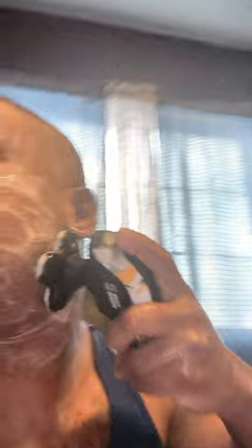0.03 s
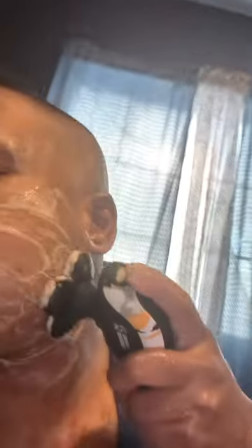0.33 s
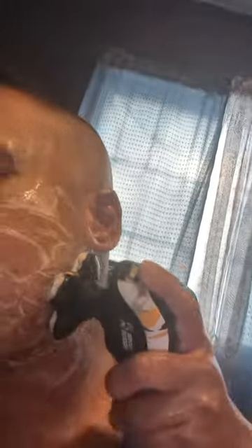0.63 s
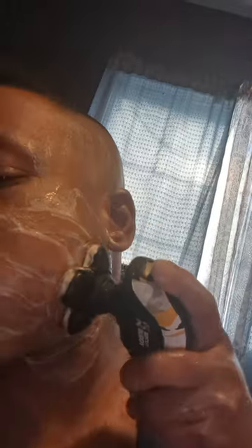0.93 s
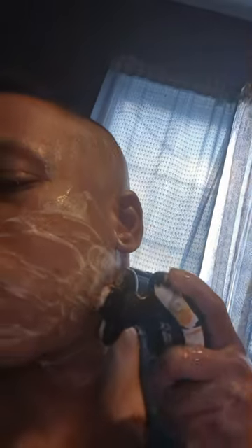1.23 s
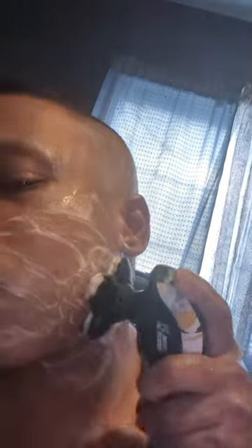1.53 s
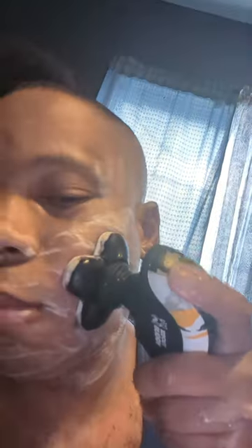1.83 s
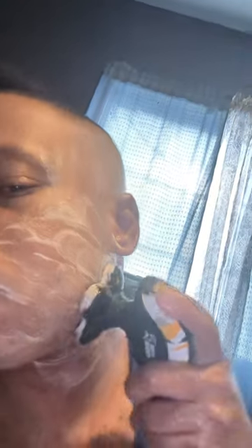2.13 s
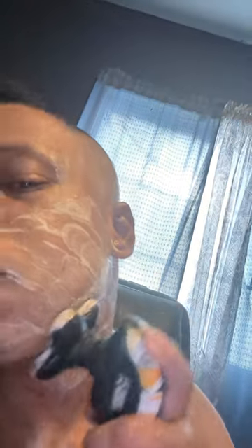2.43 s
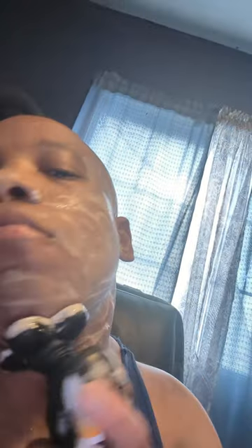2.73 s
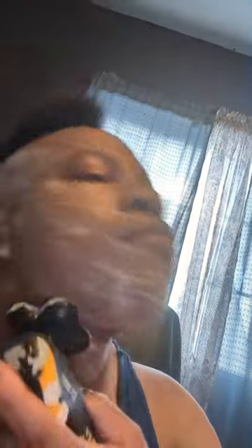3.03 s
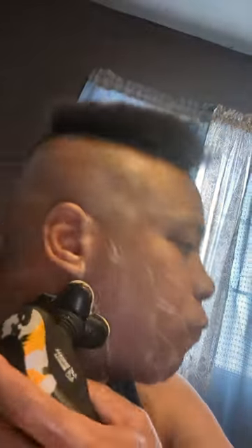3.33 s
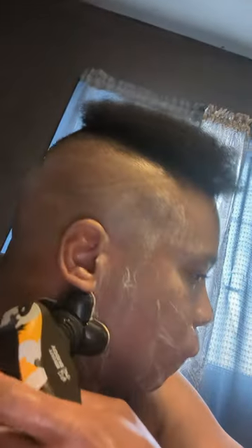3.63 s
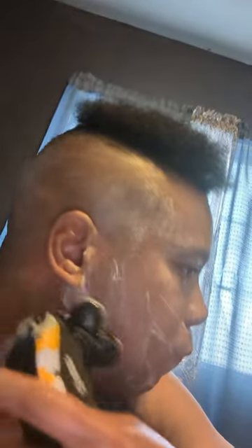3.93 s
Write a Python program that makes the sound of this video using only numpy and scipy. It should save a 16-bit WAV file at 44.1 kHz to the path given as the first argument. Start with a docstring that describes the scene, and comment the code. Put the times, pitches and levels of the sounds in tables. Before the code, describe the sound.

A rotary electric shaver runs close to the microphone in a small room, its high whine wavering as the blades rasp over stubble. A few soft handling bumps and a faint low rumble lie beneath.

```python
"""In a small room, a rotary electric shaver is worked over a cheek, close to a hand-held camera.
A small gear on the motor drives the cutters: the gear teeth whine, sag in pitch under pressure
and throb once per cutter turn. The blades rasp in their caps, which ring and scrape on the skin.
The hand bumps the camera softly over a low room rumble."""
import sys
import numpy as np
from scipy import signal
from scipy.fft import rfft, irfft, next_fast_len
from scipy.io import wavfile
from scipy.ndimage import uniform_filter1d, map_coordinates

SR = 44100
rng = np.random.default_rng(int(sys.argv[2]) if len(sys.argv) > 2 else 0)


def transcribe(u):
    """Save the signal u as a 16-bit wav file named by the first command-line argument.

    u: samples, shape (n,) or (channels, n), limited to [-1, 1]; the rate is SR.
    q: integer samples, one column per channel.
    """
    v = np.clip(np.atleast_2d(u).T, -1, 1)
    q = np.round(v * 32767).astype(np.int16)
    wavfile.write(sys.argv[1], SR, q)


N = 176400
MOTOR_TEETH, CUTTER_TEETH = 11, 30  # teeth on the motor's gear and on a cutter's gear


def cutter_turning():
    """The cutter's angle in radians; it turns more slowly when the shaver is pressed on."""
    # pitch of the main whine, twice the rate at which teeth meet (time [s], pitch [Hz])
    whine_hz = [(0, 2873), (.15, 2840), (.35, 2874), (.45, 2845), (.57, 2863), (.68, 2813), (.78, 2794),
                (.9, 2848), (1.0, 2804), (1.12, 2819), (1.2, 2791), (1.3, 2806), (1.42, 2757), (1.55, 2816),
                (1.7, 2788), (1.85, 2766), (1.97, 2827), (2.1, 2794), (2.27, 2840), (2.5, 2830),
                (2.75, 2818), (2.9, 2841), (3.03, 2875), (3.25, 2856), (3.42, 2833), (3.6, 2814),
                (3.8, 2790), (3.9, 2750), (4, 2664)]
    return 2 * np.pi * np.cumsum(curve(whine_hz) + 1.53 * wobble(18)) / (2 * CUTTER_TEETH * SR)


def gear_whine(cutter):
    """Meeting teeth whine; firm contact makes the whine loud and steadies its throb."""
    # the clear part of the whine (time [s], relative level [dB])
    whine_db = [(0, -44), (.08, -42), (.15, -51), (.398, -55.5), (.42, -38), (.52, -42.5), (.61, -38),
                (.645, -45), (.77, -44), (.91, -53), (.97, -47), (1.03, -50.5), (1.12, -41.5), (1.28, -53),
                (1.41, -44.5), (1.47, -48.5), (1.52, -39), (1.6, -56), (1.7, -42), (1.78, -46.5),
                (1.88, -60), (2.06, -50.5), (2.15, -55), (2.26, -43), (2.5, -54.5), (2.8, -45.5),
                (3.05, -51.5), (3.38, -56), (3.43, -40), (3.49, -36.5), (3.63, -50.5), (3.69, -40.5),
                (3.91, -49.5), (4, -40.5)]
    level = curve(whine_db)
    loose = np.interp(level, [-41.5, -37], [1, .45])
    clear = tone(cutter, 2 * CUTTER_TEETH, blur=.06, flutter_db=.7, drift=.1, pan_db=1.5, lead=-.7)
    blurred = tone(cutter, 2 * CUTTER_TEETH, blur=.25, flutter_db=3, drift=.17, pan_db=2.5, lead=1.87)
    whine = amp(level + 3.5) * clear + amp(-46) * blurred
    return whine * throb(cutter, depth_db=3.6 * loose, rough_db=2 * loose)


def cap_tone(cutter):
    """The caps over the blades sing their own note, 69 cycles per cutter turn."""
    # the note's strength (time [s], level [dB])
    note_db = [(.38, -55), (.43, -39), (.6, -41.5), (.7, -53), (1.2, -49), (1.5, -54), (2.4, -48.5),
               (2.8, -40.5), (3.1, -50), (3.3, -46), (4, -56)]
    note = tone(cutter, 69, blur=.08, flutter_db=1, drift=.2, lead=-.5)
    return amp(curve(note_db)) * throb(cutter, depth_db=1.5, rough_db=1.2) * note


def gear_tones(cutter):
    """Weaker gear tones, each locked to the turning of the cutter."""
    # low tones (cycles per turn), (level [dB]), and their shared swell (time [s], gain [dB])
    low_cycles = [30, 30.69, 31]
    low_db = [-60, -59.5, -64]
    swell_db = [(0, -1), (1.05, 0.5), (1.5, -3), (1.92, 2), (2.7, 0), (2.87, -13), (3.3, -4), (4, -1)]
    # steady tones (cycles per turn), (level [dB])
    steady_cycles = [35.45, 43.6, 120, 150]
    steady_db = [-62, -64, -63.5, -64]
    # two buzzes that trade places as the grip changes (cycles per turn), each (time [s], level [dB])
    buzz_cycles = [39, 46]
    buzz_db = [
        [(.7, -58), (1.4, -63), (2.5, -58), (3, -70), (3.3, -57), (4, -60)],
        [(0, -69), (.5, -59), (1.4, -67), (1.8, -61), (2.65, -53.5), (2.9, -62.5), (3.4, -55.5), (4, -60)],
    ]
    # two rougher, chattering tones (cycles per turn), both (time [s], level [dB])
    chatter_cycles = [90, 92]
    chatter_db = [(.25, -61), (.45, -52), (.85, -58), (1.2, -49.5), (1.7, -59), (2.4, -49), (2.85, -47.5),
                  (3.25, -58), (4, -55)]
    notes = [(cycles, db + curve(swell_db)) for cycles, db in zip(low_cycles, low_db)]
    notes += [*zip(steady_cycles, steady_db), *zip(buzz_cycles, map(curve, buzz_db))]
    out = np.zeros((2, N))
    for cycles, db in notes:
        note = tone(cutter, cycles, blur=.1, flutter_db=2, drift=.35, lead=-.4)
        out += amp(db) * throb(cutter, depth_db=.7, rough_db=2) * note
    for cycles in chatter_cycles:
        chatter = tone(cutter, cycles, blur=.22, flutter_db=2, drift=.4, lead=-.4)
        out += amp(curve(chatter_db)) * throb(cutter, depth_db=.7, rough_db=3) * chatter
    return out


def blade_rasp(cutter):
    """Rubbing blades and rattling gears make noise in a low, a middle and a high band."""
    # each band's strength (time [s], relative level [dB])
    low_db = [(0, -49.5), (.56, -46.5), (.7, -49), (1.41, -47), (2.57, -47.5), (3.01, -49.5), (3.3, -46.5),
              (4, -48)]
    mid_db = [(0, -44), (.45, -43), (.92, -45), (1.12, -40.5), (1.54, -43), (1.89, -46), (2.1, -42.5),
              (2.27, -41), (2.42, -41.5), (2.78, -40.5), (2.96, -43), (3.08, -39.5), (3.2, -44),
              (3.42, -41.5), (3.59, -42), (3.74, -40.5), (4, -41.5)]
    high_db = [(0, -45), (.65, -46.5), (.81, -44.5), (1.27, -45.5), (1.57, -47), (1.87, -43.5), (2.38, -48),
               (2.75, -43.5), (3.12, -46.5), (3.78, -42.5), (4, -45.5)]
    # each band's tone colour (frequency [Hz], relative level [dB])
    low_colour = [(400, -21), (900, -19), (1230, -12.5), (1420, -3.5), (1530, -5.5), (1650, 0), (1830, 2),
                  (2080, -2), (2500, 0.5), (2800, -7.5), (3500, -55)]
    mid_colour = [(1900, -39), (2450, -7), (2700, -1.5), (3480, -1.5), (3900, -4), (4270, -2), (4500, -3.5),
                  (4750, -9), (5200, -23), (6500, -67)]
    high_colour = [(3800, -17), (4900, 1), (5550, 3), (6800, -1.5), (7600, 1), (8100, -3), (8800, -0.5),
                   (9500, -7), (10000, -3.5), (10700, -8), (11600, -4.5), (12800, -3.5), (15700, -6)]
    low = rasp(cutter, low_db, low_colour, throb_db=1, beat_db=.93, repeats=(.43, .44))
    mid = rasp(cutter, mid_db, mid_colour, gain_db=2, throb_db=-.1, beat_db=.8, repeats=(.31, .44))
    high = rasp(cutter, high_db, high_colour, gain_db=2, throb_db=.7, beat_db=.72, repeats=(.31, .41))
    return low + mid + high


def cap_ringing(cutter):
    """The caps ring near 3 kHz as they bite stubble, zing between strokes, and have a thin top ring."""
    # strength of the bite, the zing and the top ring (time [s], level [dB])
    bite_db = [(0, -42), (.2, -48), (.39, -44), (.45, -45), (.6, -42), (.72, -44.5), (.9, -48), (1.15, -46),
               (1.55, -40), (1.88, -51), (2.12, -42.5), (2.27, -38), (2.45, -41.5), (2.82, -38),
               (2.97, -42), (3.06, -39.5), (3.14, -45), (3.22, -42), (3.42, -41.5), (3.62, -46), (4, -45)]
    zing_db = [(0, -59), (.16, -47), (.3, -48), (.42, -60), (.75, -59), (.83, -45.5), (.93, -48.5),
               (1.06, -60), (1.6, -57), (1.9, -49), (2.22, -55), (2.75, -47.5), (3.1, -50), (3.55, -57.5),
               (4, -53)]
    top_db = [(0, -67), (.15, -50.5), (.58, -52), (.8, -62), (1.05, -51.5), (1.4, -62), (1.8, -52),
              (2.35, -60), (2.6, -51), (2.82, -48), (3.0, -55), (4, -55)]
    # tone colour of the bite (frequency [Hz], relative level [dB])
    bite_colour = [(2600, -66), (2780, -10), (2930, -6), (3100, -1), (3260, -3.5), (3380, -8.5),
                   (3700, -25)]
    zing = rasp(cutter, zing_db, resonance(hz=8730, width_hz=860))
    top = rasp(cutter, top_db, resonance(hz=11750, width_hz=1060))
    return zing + top + rasp(cutter, bite_db, bite_colour)


def skin_scrape(cutter):
    """Pressing the shaver on the skin brings out a bright scrape, louder on the left."""
    # how hard it presses (time [s], relative level [dB])
    press_db = [(.25, -3.5), (.42, 5.5), (.65, 1), (.95, -2.5), (1.15, 5.5), (1.4, 4), (1.6, 1),
                (2.05, 0.5), (2.4, 2), (2.8, 8.5), (3.05, 3), (3.2, -2), (3.45, 3.5), (4, 1)]
    # tone colour of the scrape (frequency [Hz], relative level [dB])
    colour = [(3500, -53), (5050, -10), (5580, 6), (5950, 1), (6300, 3), (7400, -4), (10000, -31)]
    return rasp(cutter, press_db, colour, gain_db=-53) * amp([[3], [-5]])


def hand_bumps():
    """The hand bumps the camera: each dull thud sets the camera body humming."""
    # soft bumps (time [s], half length [s], relative level [dB])
    bumps = [(0.161, 0.0094, -50.5), (0.362, 0.03, -50.5), (.68, 0.01, -52.5), (0.753, 0.022, -49),
             (1.11, 0.05, -60.5), (1.283, 0.048, -57.5), (2.565, .02, -47.5), (3.747, 0.022, -43.5)]
    # tone colour of a thud (frequency [Hz], relative level [dB])
    colour = [(30, -48), (60, -18), (102, -6), (175, -18), (228, -10.5), (260, -2.5), (295, -13),
              (545, -23), (1200, -65)]
    body_hz = 260
    t = np.arange(N) / SR
    grip = sum(amp(db) * np.exp(-.5 * ((t - when) / half) ** 2) for when, half, db in bumps)
    angle = 2 * np.pi * body_hz * t + .5 * wobble(60)
    hum = unit(np.real(microphones(body_hz) * np.exp(1j * angle)))
    thud = spread(rng.standard_normal((2, N)), colour)
    return grip * (.65 * thud + .67 * hum)


def room_rumble():
    """A low, steady noise fills the room."""
    # tone colour of the rumble (frequency [Hz], relative level [dB])
    colour = [(35, -46), (55, -15.5), (100, 0), (130, -4.5), (190, -18), (260, -1.5), (310, -10),
              (370, -10), (900, -22), (2000, -30.5)]
    return amp(-60.5) * spread(rng.standard_normal((2, N)), colour)


def tone(cutter, cycles, blur, flutter_db, drift, pan_db=0, lead=0):
    """A tone of so many cycles per turn, wavering as the shaver moves; blur, drift, lead in radians."""
    hz = cycles * np.mean(np.diff(cutter)) * SR / (2 * np.pi)
    angle = cycles * cutter + blur * wobble(70) + rng.uniform(0, 2 * np.pi)
    paths = []
    for side in (.5, -.5):  # left, right
        gain = amp(side * pan_db + flutter_db * wobble(11))
        phase = drift * wobble(3.97) - side * lead
        paths.append(gain * np.exp(1j * phase))
    return unit(np.real(microphones(hz) * np.array(paths) * np.exp(1j * angle)))


def throb(cutter, depth_db, rough_db):
    """A gain that swells unevenly once per cutter turn."""
    return unit(amp(depth_db * np.cos(cutter + .8 * wobble(20)) + rough_db * wobble(260)))


def rasp(cutter, level, colour, gain_db=0, throb_db=.5, beat_db=.42, repeats=(.35, .45)):
    """Rubbing noise that pulses with cutter and motor; part of it repeats on every turn of each."""
    motor = cutter * CUTTER_TEETH / MOTOR_TEETH
    beats = np.cos(4 * cutter) + np.cos(motor) + .62 * np.cos(2 * motor) + wobble(400)
    pulse_db = throb_db * np.cos(cutter) + beat_db * beats
    motor_share, cutter_share = repeats
    noise = rng.standard_normal((2, N))
    noise += motor_share * rough_surface(motor, spots=320)
    noise += cutter_share * rough_surface(cutter, spots=880)
    return amp(curve(level) + gain_db + .9 * wobble(12)) * spread(noise * amp(pulse_db), colour)


def rough_surface(angle, spots):
    """A turning part rubs over the same random rough spots on every turn."""
    place = angle / (2 * np.pi) * spots
    surfaces = rng.standard_normal((2, spots))
    return unit(np.array([map_coordinates(s, [place], mode="grid-wrap") for s in surfaces]))


def reflections(x, depth_db):
    """Sound bouncing off face and hand makes narrow bands swell and fade as the shaver moves."""
    bands = signal.stft(x, nperseg=1024)[2]
    swell = uniform_filter1d(rng.standard_normal(bands.shape), size=4, axis=1)  # smooth over frequency
    swell = uniform_filter1d(swell, size=18, axis=2)  # and over time
    return signal.istft(bands * unit(amp(depth_db * unit(swell))), nperseg=1024)[1][:, :N]


def spread(pair, colour):
    """Give two unrelated noises a tone colour and share them between the microphones, at strength 1."""
    # how alike left and right are (frequency [Hz], likeness [0 to 1])
    likeness = [(100, 1), (260, 0.84), (600, 0.37), (1800, 0.5), (2300, .2), (3000, 0.56), (3500, 0.23),
                (6000, 0.1), (12000, 0.13)]

    def gains(hz):
        blend = np.arccos(np.clip(along(likeness, hz), -1, 1)) / 2
        return amp(along(colour, hz)) * [np.cos(blend), np.sin(blend)]

    middle, side = filtered(pair, gains)
    return unit(filtered(np.array([middle + side, middle - side]), microphones))


def microphones(hz):
    """How strongly and how early a frequency reaches the left and right microphone."""
    # which side is louder (frequency [Hz], left minus right [dB])
    balance = [(100, 0.8), (260, 3), (600, -0.3), (1400, 5), (2000, 4), (2800, .8), (3600, -1.3),
               (8800, 1.5), (12000, -1.5)]
    # how far the right side's wave is ahead (frequency [Hz], phase [radians])
    right_leads = [(600, -0.1), (1400, 0.99), (2400, 0.92), (3500, 3), (4500, 2), (5500, 0), (12000, -1)]
    side = np.array([[.5], [-.5]])
    return amp(side * along(balance, hz)) * np.exp(-1j * side * along(right_leads, hz))


def resonance(hz, width_hz):
    """The tone colour of one ringing peak, as rows of (frequency [Hz], level [dB])."""
    f = np.geomspace(20, SR / 2, 600)
    return np.transpose([f, -20 * np.log10(1 + (2 * (f - hz) / width_hz) ** 2)])


def amp(db):
    """Turn decibels into a gain."""
    return 10 ** (np.asarray(db) / 20)


def unit(x):
    """Scale a signal to an average strength (rms) of 1."""
    return x / np.sqrt(np.mean(x ** 2) + 1e-20)


def along(points, hz):
    """Read (frequency [Hz], value) rows at hz, with octaves evenly spaced."""
    f, values = np.transpose(points)
    return np.interp(np.log(hz + 1), np.log(f + 1), values)


def curve(rows):
    """Read (time [s], value) rows at every sample."""
    return np.interp(np.arange(N) / SR, *np.transpose(rows))


def wobble(rate):
    """A smooth curve through `rate` random values a second."""
    return map_coordinates(rng.standard_normal(int(N * rate / SR) + 4), [np.arange(N) * rate / SR])


def filtered(x, response):
    """Scale each frequency in x by response(hz)."""
    size = next_fast_len(N + SR // 2)
    return irfft(rfft(x, size) * response(np.fft.rfftfreq(size, 1 / SR)), size)[..., :N]


def scene():
    """One turning cutter drives every part of the shaver; bumps and rumble lie beneath."""
    # where the shaver sits between the microphones (time [s], left minus right [dB])
    pan_db = [(0, .6), (1.7, -1), (2.8, 2), (3.3, 0.4), (4, .5)]
    cutter = cutter_turning()
    tones = gear_whine(cutter) + cap_tone(cutter) + gear_tones(cutter)
    rubbing = blade_rasp(cutter) + cap_ringing(cutter) + skin_scrape(cutter)
    shaver = tones + reflections(rubbing, depth_db=2.03)
    pan = amp(np.outer([.5, -.5], curve(pan_db)))
    return shaver * pan + room_rumble() + hand_bumps()


def record(dry):
    """The camera cuts off the very highest treble."""
    return filtered(dry, lambda hz: hz < 15850)


dry = scene()
out = record(dry)
transcribe(out)
```